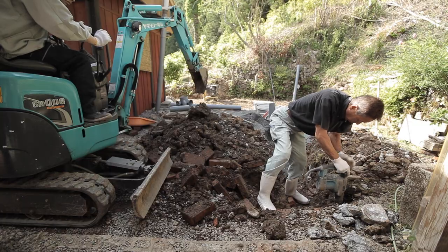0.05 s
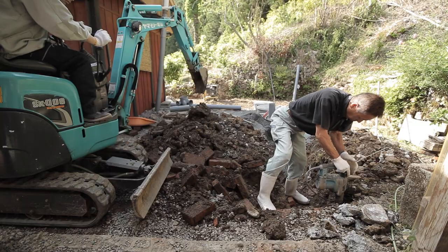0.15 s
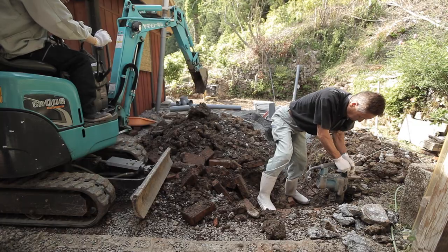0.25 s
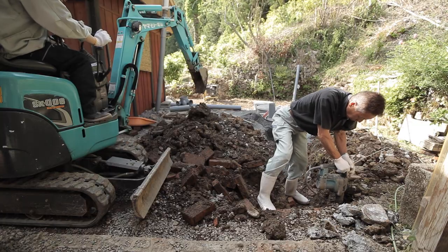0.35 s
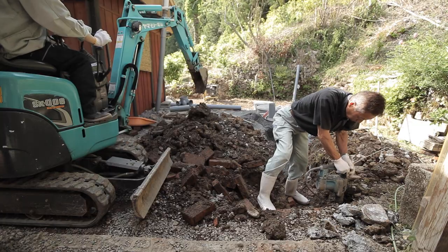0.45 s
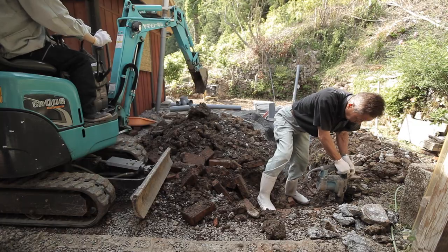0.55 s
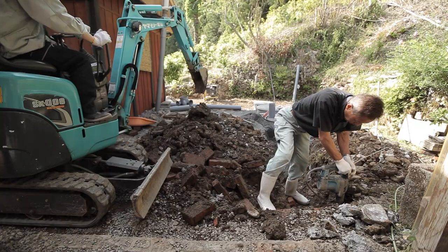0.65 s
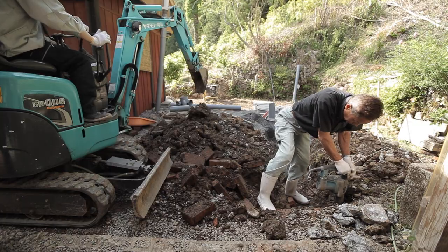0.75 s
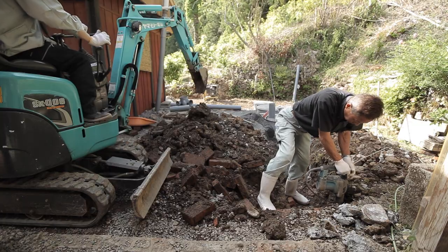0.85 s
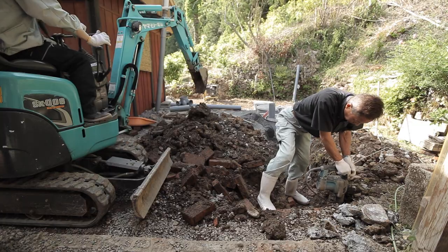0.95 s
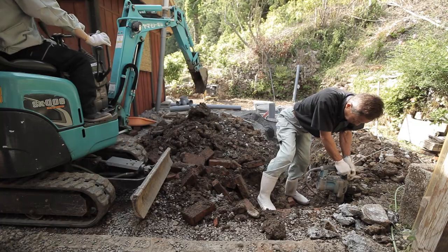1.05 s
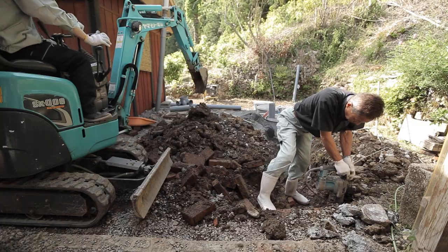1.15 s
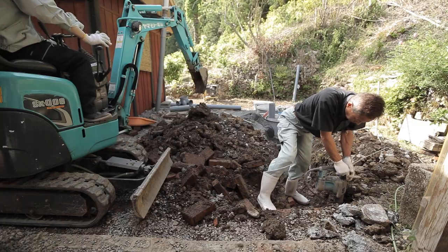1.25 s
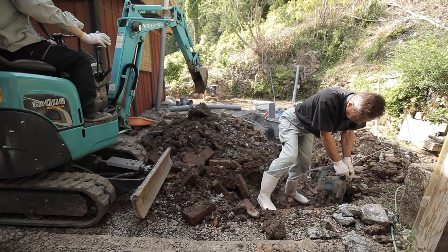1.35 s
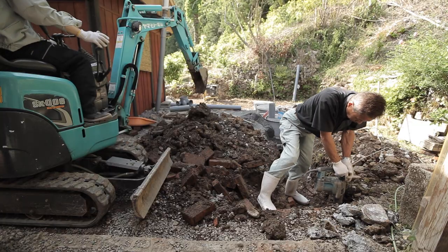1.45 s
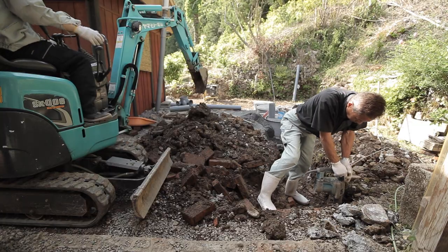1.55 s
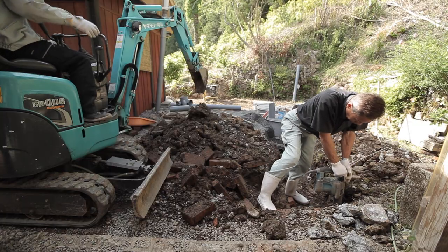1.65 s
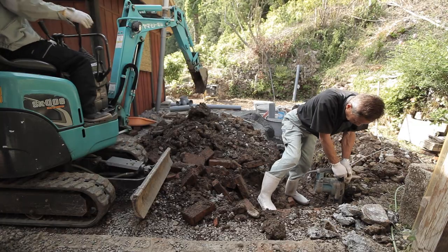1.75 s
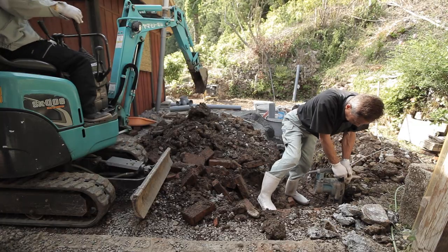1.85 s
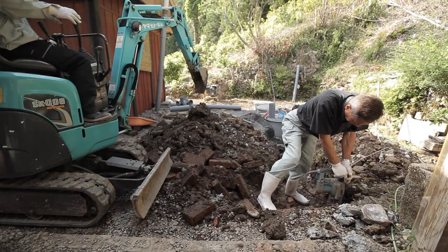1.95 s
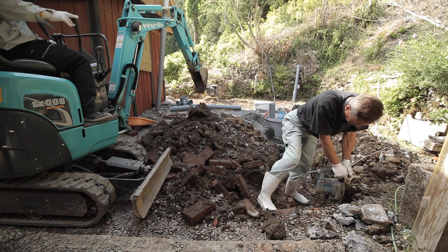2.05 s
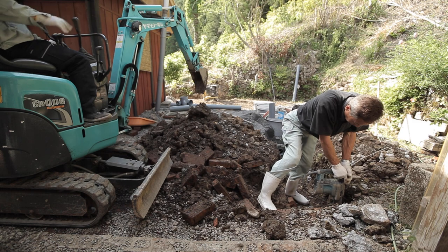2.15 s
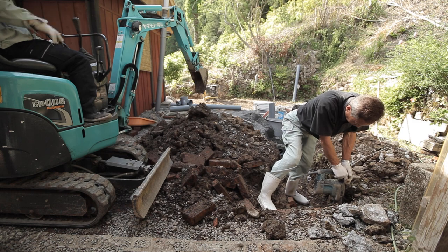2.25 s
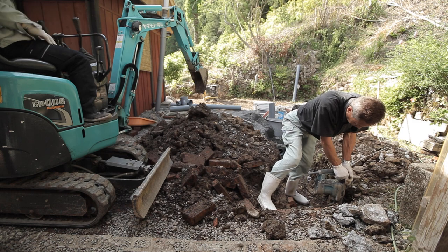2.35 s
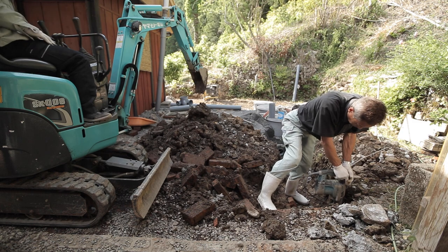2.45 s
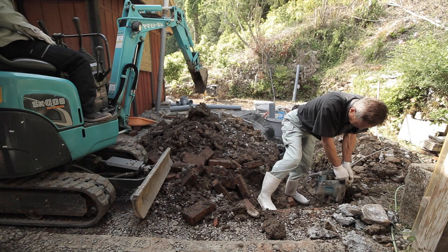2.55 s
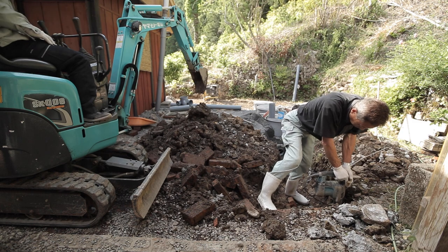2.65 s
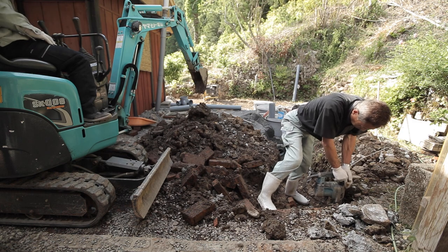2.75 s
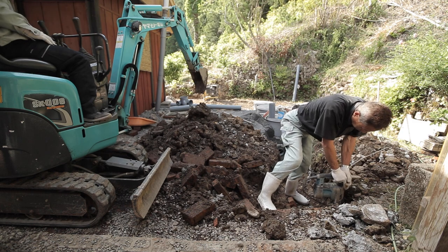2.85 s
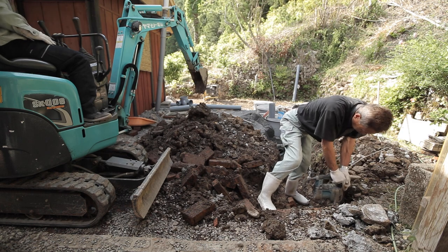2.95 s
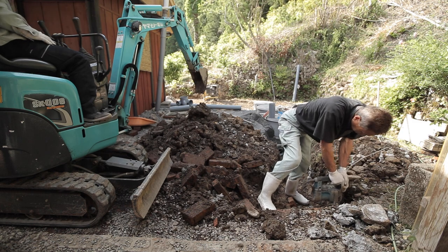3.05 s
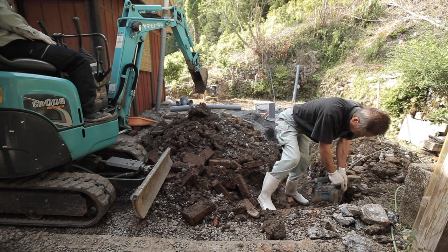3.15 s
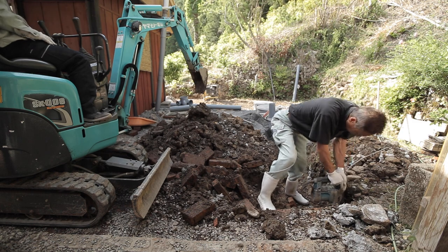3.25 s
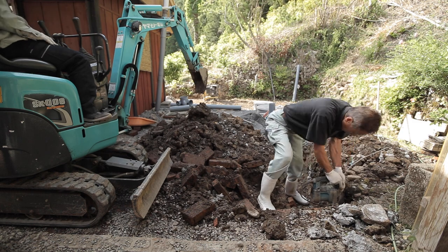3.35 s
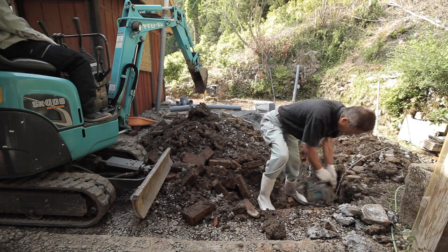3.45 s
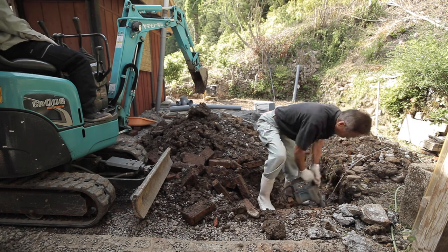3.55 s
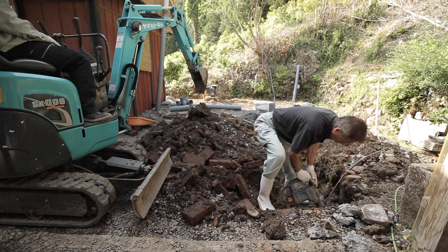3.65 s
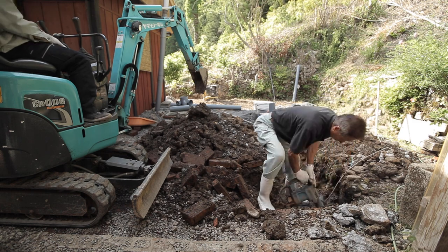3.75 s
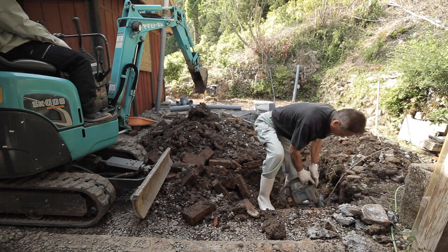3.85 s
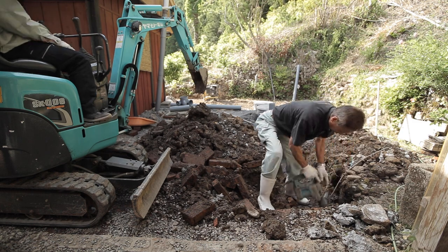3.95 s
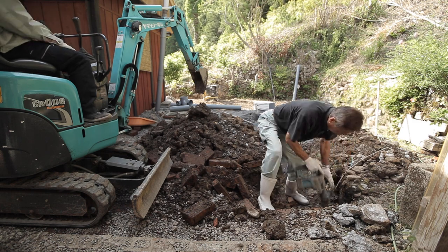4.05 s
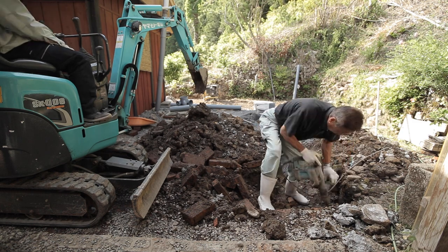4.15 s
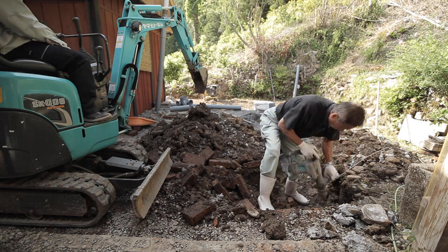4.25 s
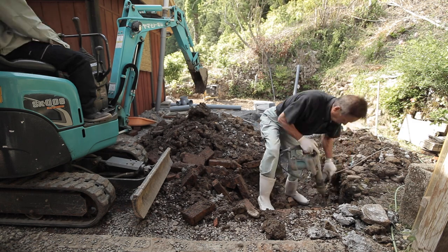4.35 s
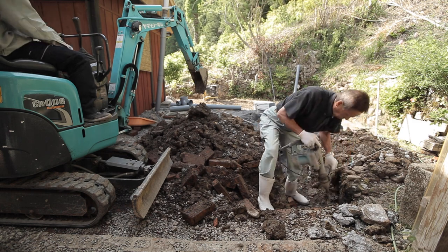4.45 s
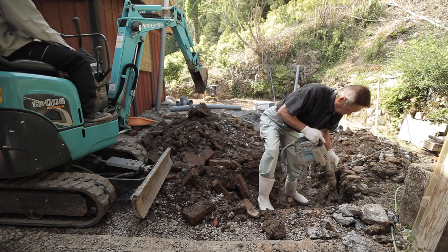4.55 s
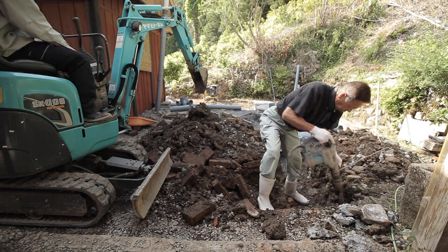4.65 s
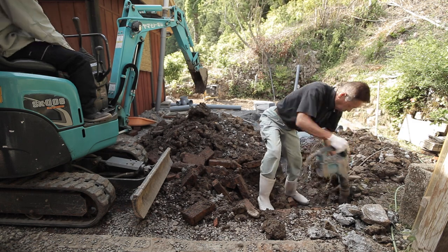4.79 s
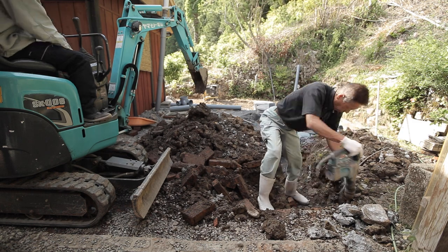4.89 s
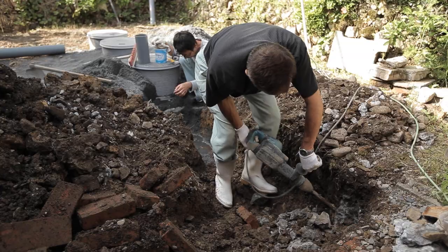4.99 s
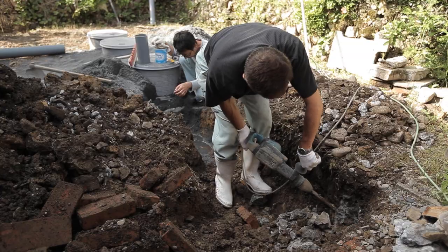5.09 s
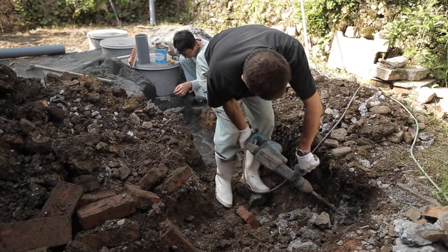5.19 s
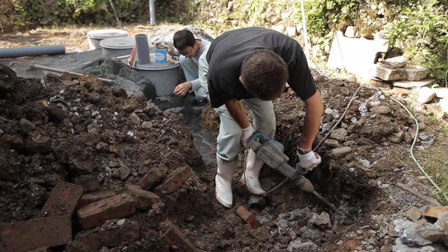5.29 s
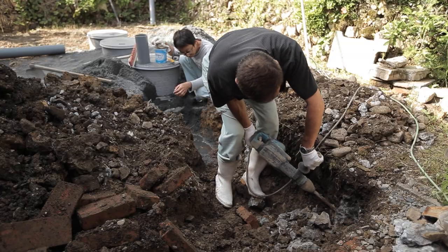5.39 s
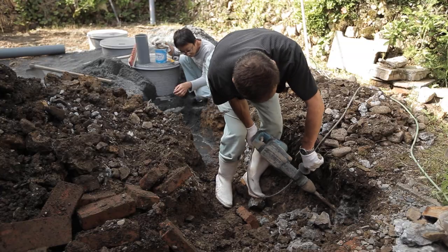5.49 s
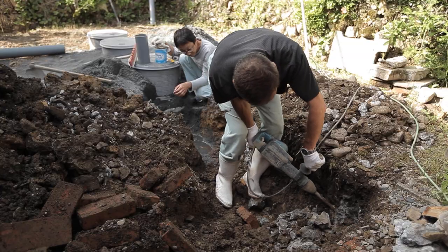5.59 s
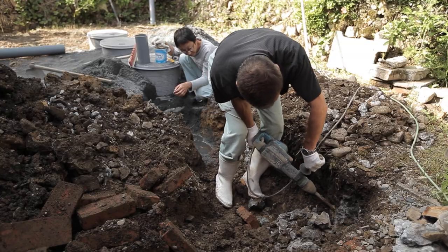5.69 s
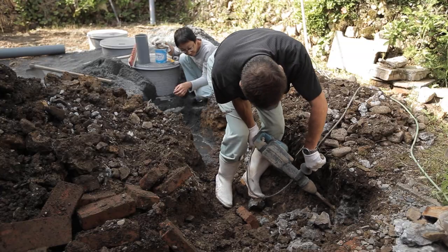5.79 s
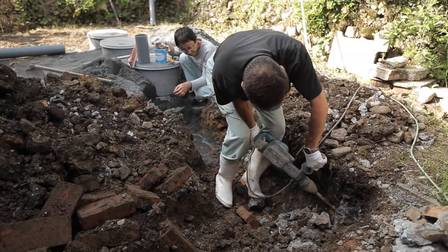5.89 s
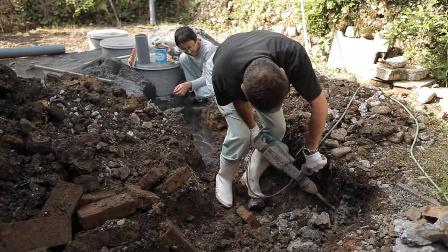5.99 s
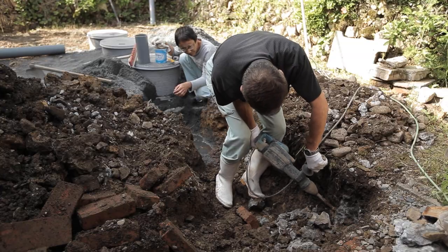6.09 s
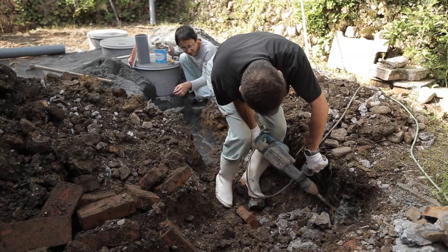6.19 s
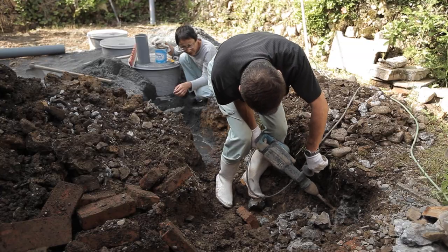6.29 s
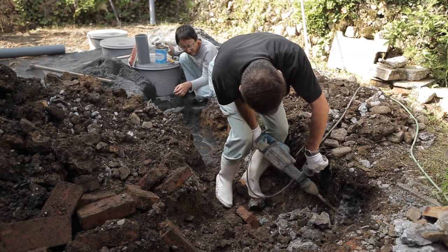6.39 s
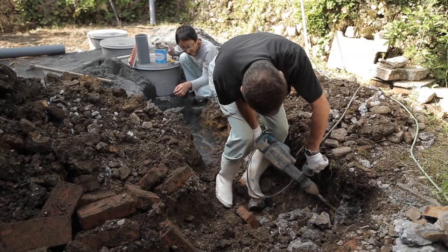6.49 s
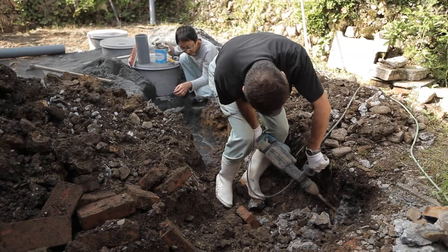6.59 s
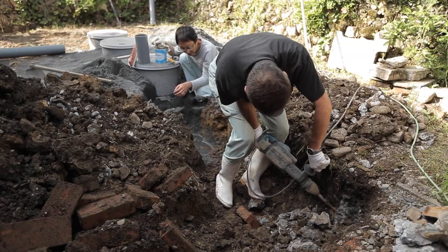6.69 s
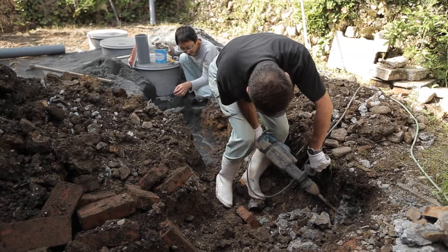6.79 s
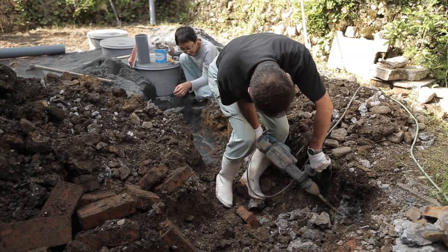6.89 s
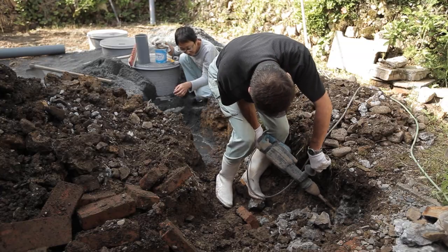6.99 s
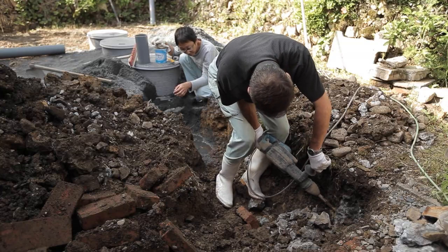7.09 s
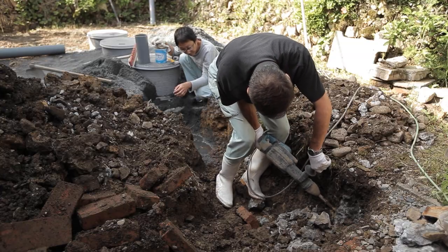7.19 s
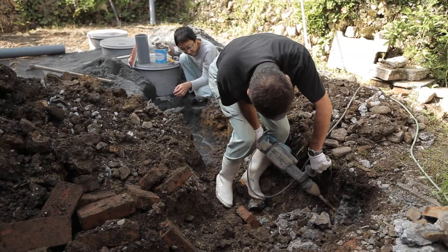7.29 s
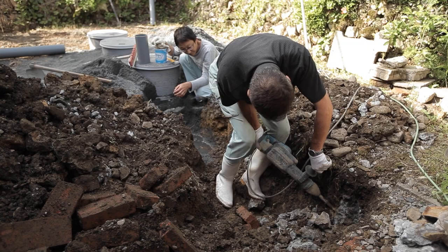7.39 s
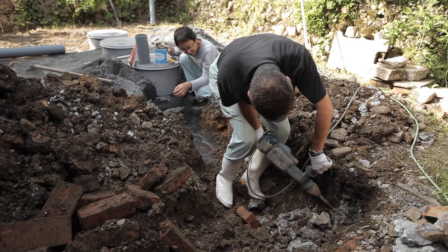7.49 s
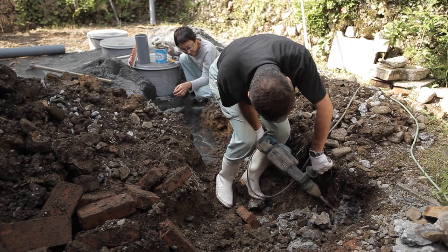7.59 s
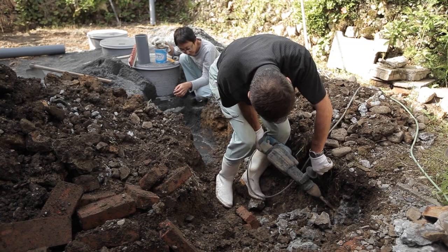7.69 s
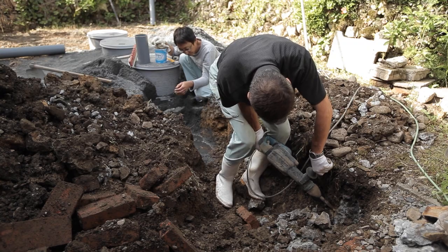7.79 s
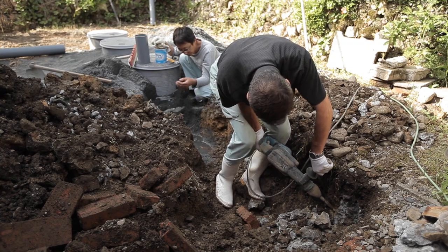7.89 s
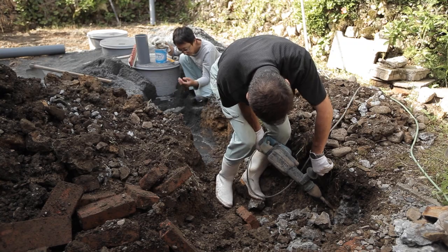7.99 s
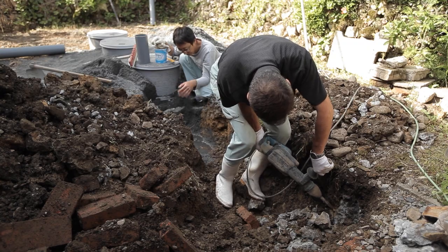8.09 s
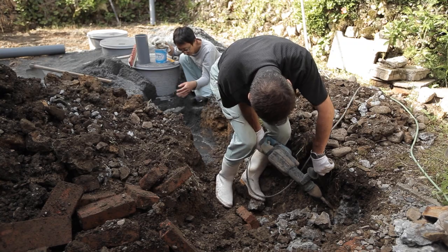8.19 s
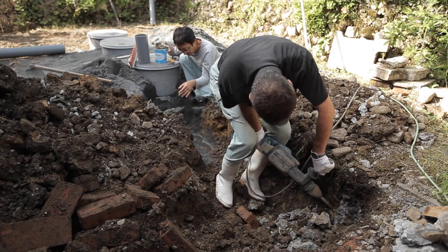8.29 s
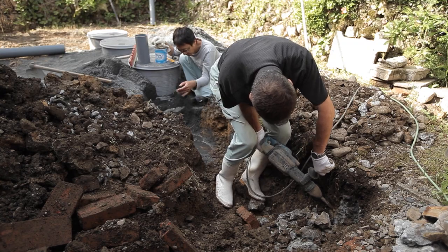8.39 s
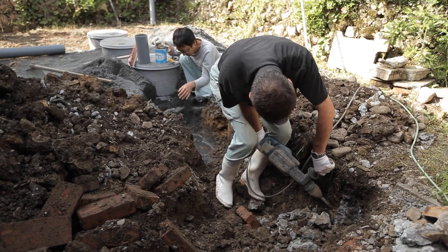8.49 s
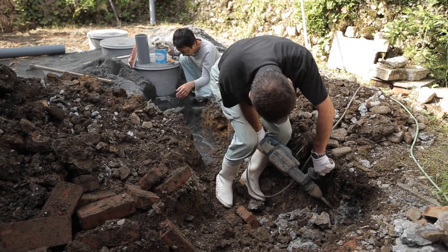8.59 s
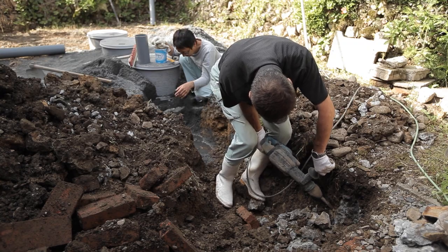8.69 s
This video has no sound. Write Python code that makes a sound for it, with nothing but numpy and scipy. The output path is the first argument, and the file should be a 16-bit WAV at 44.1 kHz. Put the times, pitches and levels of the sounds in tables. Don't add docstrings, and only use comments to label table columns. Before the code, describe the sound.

From 0 to about 3.5 s an electric demolition hammer is already working on stony ground, striking roughly 44 times a second so the blows fuse into a harsh, throbbing rattle: dull mid-range thuds, low air push, whining gear teeth, bright steel and sprayed grit, with dull outdoor echoes. The thud weakens from about 2.8 s. Around 3.6 s the tool lifts; a couple of loose taps, then a thinner whirring idle with brush hiss and housing clatter, sagging slightly in speed near 4 s. A soft low thump comes at 4.7 s, then a brief bite from 4.84 to 5.0 s. The scene cuts abruptly; sharp ticking taps run to 5.35 s, hammering resumes lightly, strengthens after 5.6 s, speeds up near 6.4 s and continues to the end at 8.7 s, brighter and more ringing. Loud peaks distort the small microphone.

```python
import sys
import numpy as np
from scipy import signal
from scipy.fft import rfft, irfft
from scipy.io import wavfile
from scipy.ndimage import uniform_filter1d

SR = 44100
rng = np.random.default_rng(int(sys.argv[2]) if len(sys.argv) > 2 else 0)


def attenuation_scalar(level_db):
    decades = np.asarray(level_db, float) / 20
    return 10 ** decades


def transcribe(u):
    v = np.clip(np.atleast_2d(u).T, -1, 1)
    q = np.round(v * 32767).astype(np.int16)
    wavfile.write(sys.argv[1], SR, q)


N = 385434
T = np.arange(N) / SR
SCENE_CHANGE_S = 5.012
SECOND_SIDE = (T > 4.2).astype(int)
USUAL_DB = -35


def columns(rows):
    s, *values = np.transpose(rows)
    return [np.interp(T, s, v) for v in values]


def evened(x):
    return x / np.sqrt(np.mean(x ** 2) + 1e-20)


def filtered(x, order, hz, kind):
    return signal.sosfilt(signal.butter(order, hz, kind, fs=SR, output="sos"), x)


def coloured(x, points):
    f, level_db = np.transpose(points)
    hz = np.fft.rfftfreq(len(x), 1 / SR)
    gain_db = np.interp(np.log(hz + 1), np.log(f + 1), level_db)
    return irfft(rfft(x) * attenuation_scalar(gain_db), len(x))


def band_evened(x, lo_hz, hi_hz):
    power = filtered(x, 4, [lo_hz, hi_hz], "bandpass") ** 2
    smooth = uniform_filter1d(uniform_filter1d(power, 4000), 4000)
    return x / np.sqrt(abs(smooth) + 1e-12)


def drift(seconds):
    size = round(seconds * SR)
    return evened(uniform_filter1d(uniform_filter1d(rng.standard_normal(N), size), size))


def modes(x, table, spans, wander=0., flip=1):
    out = np.zeros(N)
    sway = wander * drift(0.012)
    for k, ((hz, width, db), (start, end)) in enumerate(zip(table, spans)):
        a, b = max(round(start * SR), 0), min(round(end * SR), N)
        own_sway = np.roll(sway, k * SR // 2)[a:b]
        carrier = np.exp(2j * np.pi * np.cumsum(hz * (1 + own_sway)) / SR)
        decay = np.exp(-np.pi * width / SR)
        ringing = (carrier * signal.lfilter([1j], [1, -decay], x[a:b] / carrier)).real
        out[a:b] += flip ** k * attenuation_scalar(db) * np.sqrt(width) * ringing
    return out


def lobe(turns, place, length):
    off = (turns - place + .5) % 1 - .5
    return off, np.exp(-.5 * (off / length) ** 2)


def eased():
    moment_s, length_s, dip_db = 5.81, 0.035, -6
    return dip_db * np.exp(-.5 * ((T - moment_s) / length_s) ** 2)


def crank():
    # start in seconds, crank speed in turns per second held from then on.
    speed_steps = [(0, 44.161), (.9, 44.114), (1.6, 44.177), (2.9, 44.025), (3.3, 44.175), (3.5, 44.708),
                   (3.74, 43.056), (3.92, 41.9), (3.97, 40.1), (4.07, 41.63), (4.2, 41.366),
                   (5.012, 41.316), (5.6, 41.178), (6.33, 42.857), (6.4, 44.66), (6.65, 44.082),
                   (7.2, 44.2), (8.4, 43.382)]
    s, per_s = np.transpose(speed_steps)
    held = per_s[np.searchsorted(s, T, "right") - 1]
    settle_s = .09
    speed = uniform_filter1d(held, round(settle_s * SR), mode="nearest")
    return -.11 + np.cumsum(speed) / SR + .22 * (T >= SCENE_CHANGE_S)


def site(x):
    t = np.arange(SR // 4) / SR
    tail = rng.standard_normal(len(t)) * attenuation_scalar(-60 * t / 0.27) * (t > .012)
    tail = coloured(tail, [(120, -12), (900, -12), (2000, -4), (4000, -4), (9000, -12)])
    return signal.fftconvolve(x, tail / np.linalg.norm(tail))[:N]


def footfall():
    t = np.maximum(T - 4.735, 0)
    return attenuation_scalar(-44) * np.sin(2 * np.pi * 135 * t) * (t / 0.016) * np.exp(1 - t / 0.011)


def taps():
    # start in seconds, peak level in dB.
    single_strokes = [(3.712, -31), (3.7589, -34), (3.9938, -39), (4.7775, -26), (5.03, -22), (5.0769, -28),
                      (5.1248, -20.5), (5.151, -19), (5.223, -24), (5.2954, -24), (5.340, -16)]
    drive = np.zeros(N)
    spit = np.exp(-np.arange(400) / 57.0)
    for s, db in single_strokes:
        at = round(s * SR)
        drive[at:at + 400] += attenuation_scalar(db) * spit * rng.standard_normal(400)
    click = coloured(drive, [(1500, -25), (5000, 0), (16000, -3)])
    ping = modes(drive, [(8730, 180, 0.051)], [(0, N / SR)])
    return attenuation_scalar(-12) * click + attenuation_scalar(-34.5) * ping


def clatter(throb):
    # resonance in Hz, width in Hz, level in dB.
    housing_parts = [(218, 20, -21.5), (547, 43, -13), (1465, 80, -35), (3960, 250, -2.5),
                     (5280, 260, -4.5), (6300, 200, -16), (9800, 200, -16)]
    knocks = rng.standard_normal(N) * attenuation_scalar(throb + 7.0 * drift(0.0013))
    total = np.zeros(N)
    for part in housing_parts:
        total += attenuation_scalar(6.6 * drift(0.077)) * modes(knocks, [part], [(0.0075, N / SR)], 0.006)
    return evened(total)


def motor_hiss(turns, throb_db):
    # frequency in Hz, noise density in dB per Hz.
    hiss_colour = [(30, -65), (165, -29), (344, -17), (560, -8.5), (780, -5), (1000, -5), (1750, -4.5),
                   (2800, -10), (3900, -7), (5200, -11), (7000, -14.5), (9300, -17), (10800, -31),
                   (15800, -32)]
    throb = -1.6 * lobe(turns, .42, 0.15)[1] - 1.6 * lobe(turns, 0.99, 0.017)[1]
    hiss = band_evened(coloured(rng.standard_normal(N), hiss_colour), 2050, 3500)
    hiss = hiss * attenuation_scalar(throb_db * throb + 1.66 * drift(0.003))
    return hiss + attenuation_scalar(-5.0) * clatter(throb_db * throb)


def motor():
    # time in seconds, load on the teeth in dB, lean of the mesh toward its octave in dB.
    tooth_load = [(0, -27.5, -12), (1.5, -29.5, -8), (2.2, -30.5, -2), (2.4, -32, -4), (3.5, -33.5, 3.5),
                  (3.62, -38, -1.5), (3.85, -39.5, 4), (4.02, -55, 17.5), (4.12, -39, 4.5),
                  (4.6, -37.5, 7.5), (4.98, -33, -1.5), (5.04, -46, 10.5), (5.45, -42, 12),
                  (5.58, -29.5, -3), (5.8, -33.5, -2), (5.92, -29, -16), (7.2, -28, -10.5),
                  (8.74, -23, -4.5)]
    gear_push = [(0, 0.87, 0.08, 1, 0.27), (3.5, 0.76, 0.16, 0.82, 0.16), (3.7, .75, 0.11, .68, 0.09),
                 (5.3, 0.72, 0.11, 0.64, 0.09), (5.9, 0.8, .08, 0.7, 0.22), (6.4, 0.85, 0.11, 0.74, 0.11),
                 (8.74, 0.81, 0.07, 0.93, 0.06)]
    # time in seconds, return-stroke share of the octave (0-1), high tooth orders in dB, hiss throb in
    # dB.
    return_stroke = [(0, 0, 1, -2), (2.7, 0, -5.5, 0), (3.5, 0, -7, 1), (3.7, 0.8, -0.5, 1.5),
                     (4.1, 0.77, -19, 1), (5.3, 0.95, -14, 4), (5.5, 0, -9, 0), (6.3, 0.3, 6, 4.5),
                     (6.5, 0.8, 7, 4.5), (8.74, 0.4, -9, -4.5)]
    # time in seconds, whine in cycles per turn, octave in cycles per turn.
    tooth_rate = [(0, 43, 82.7), (3.4, 42.8, 82.2), (3.68, 42, 81.6), (3.82, 42, 83.6), (4.0, 42, 81.8),
                  (4.12, 42, 83.4), (4.25, 42, 82.6), (4.8, 42, 82.6), (4.95, 41, 80.5), (5.1, 41.5, 82.6),
                  (5.6, 42.4, 82.2), (6.2, 42.6, 82), (6.4, 41.3, 82.5), (8.25, 41, 81.5),
                  (8.4, 40.2, 81.7), (8.74, 40.3, 82)]
    turns = crank()
    load_db, lean_db = columns(tooth_load)
    cycles, cycles2 = columns(tooth_rate)
    place, length, place2, length2 = columns(gear_push)
    back, high_db, throb_db = columns(return_stroke)

    slack = 0.27 * np.maximum(-33.5 - load_db, 0)
    whine_db = load_db + slack * drift(0.026)
    octave_db = load_db + lean_db
    hiss_db = -35 + 0.057 * (load_db - USUAL_DB) + .8 * drift(.03) + eased()

    off, bell = lobe(turns, place, length)
    after, echo = lobe(turns, place + .24, 0.023)
    whine = bell * np.sin(2 * np.pi * cycles * off)
    whine = whine + 1.73 * echo * np.sin(2 * np.pi * cycles * after)

    off, bell = lobe(turns, place2, length2)
    after, echo = lobe(turns, place2 + .5, length2)
    octave = bell * np.sin(2 * np.pi * cycles2 * off + 0.48 * drift(0.0043))
    octave = octave + back * echo * np.sin(2 * np.pi * cycles2 * after + 0.12 * drift(0.0056))
    high = np.zeros(N)
    for order, db in ((3, 4.0), (4, 4.5), (5, 2)):
        high += attenuation_scalar(db) * np.sin(np.pi * order * cycles2 * off + 2.8 * drift(0.0092))
    octave = evened(octave) * attenuation_scalar(1.2 * drift(0.05)) + attenuation_scalar(high_db) * evened(bell * high)

    whine = attenuation_scalar(whine_db - 2.5 + 0.5 * drift(0.02)) * evened(whine)
    return whine + attenuation_scalar(octave_db - 3.0) * octave + attenuation_scalar(hiss_db - 4.0) * motor_hiss(turns, throb_db)


def ground_shake(hit):
    shake = filtered(hit + 0.016 * rng.standard_normal(N), 2, [30, 100], "bandpass")
    return attenuation_scalar(-65 + 16 * SECOND_SIDE) * evened(shake)


def air_push(hit, luck):
    # resonance in Hz, width in Hz, level in dB.
    low_modes = [(193, 34, 32), (270, 270, -18), (127.6, 13, 6.5), (262, 38, 6.5)]
    low_spans = [(0, 4), (0, 4), (5.9, 9), (4, 9)]
    late_s = [0.0046, 0.00603]
    push = modes(hit * attenuation_scalar(0.22 * luck[:, 1]), low_modes, low_spans)
    first, second = [np.roll(push, round(s * SR)) for s in late_s]
    low = filtered(np.where(SECOND_SIDE, second, first), 4, 145, "highpass")
    return band_evened(low, 110, 280)


def ground_thud(hit, luck, rattle):
    # resonance in Hz, width in Hz, level in dB.
    thud_modes = [(348, 145, 5), (473, 57, 2), (665, 53, -3.5), (565, 99, 0.5), (712.6, 60, 6),
                  (813, 24, -6.5), (435, 230, 4.5), (1032, 39, 2.5), (434, 43, -2.5), (670, 160, 9),
                  (1026, 95, 5.5), (1268, 64, 4.5), (351, 97, -2.5), (610, 81, 3), (825, 50, 2),
                  (1004, 83, -0.5)]
    thud_spans = [(0, 2.82), (0, 2.82), (0, 2.82), (0, .64), (0, 3.6), (1, 2.82), (2.82, 3.6), (2.82, 3.4),
                  (4.5, 5.2), (4.5, 5.2), (4.5, 5.2), (4.5, 5.2), (5.2, 9), (6.4, 9), (5.2, 9), (5.2, 9)]
    at = np.flatnonzero(hit)
    loose = 1 + (T[at] < .64)
    slip = .00017 * SR * luck[at, 2] * attenuation_scalar(5 * drift(.08)[at]) * loose
    slipped = np.zeros(N)
    slipped[np.clip(at + abs(slip).astype(int), 0, N - 1)] = 1
    grind = np.array([.012, .05])[SECOND_SIDE] * rattle * rng.standard_normal(N)
    thud = modes(slipped * attenuation_scalar(1.6 * luck[:, 0]) + grind, thud_modes, thud_spans, 0.016, flip=-0.96)
    return band_evened(filtered(thud, 4, 145, "highpass"), 300, 900)


def steel_ring(hit, luck, part, rattle):
    # resonance in Hz, width in Hz, level in dB.
    steel_modes = [(4470, 180, -6), (5800, 120, -15), (8760, 150, 6), (8860, 870, 0), (9460, 52, -11),
                   (12300, 220, -4), (3980, 670, -13.5), (5610, 290, -1), (5930, 100, -10), (8706, 180, 3),
                   (9130, 140, -1.5), (9800, 42, -10), (12380, 140, -4.5), (12530, 350, -4)]
    steel_spans = [(0, 4), (0, 4), (0, .3), (0, 4), (1.9, 4), (0, .25), (4, 9), (5.2, 9), (5.45, 5.82),
                   (4, 9), (5.8, 9), (4.93, 6.35), (4, 7.55), (7.55, 9)]
    strike = np.array([.3, 6.5])[SECOND_SIDE] * hit * attenuation_scalar(3.3 * luck[:, 0])
    ring = modes(strike + rattle * rng.standard_normal(N), steel_modes, steel_spans, 0.0087)
    gripped = uniform_filter1d(1. * (part > .4), size=80)
    return band_evened(ring * attenuation_scalar(-2 * SECOND_SIDE * gripped), 8200, 10000)


def grit_spray(luck, part):
    # frequency in Hz, noise density in dB per Hz.
    grit_colours = [
        [(300, 14), (900, 12), (2500, 13.5), (6000, 13.5), (10000, 11.5), (12000, -4.5), (15500, -2.5)],
        [(300, -4), (900, 14.5), (2500, 12.5), (6000, 12.5), (10000, 11), (12000, -1), (15500, -1.5)],
    ]
    late = lobe(part, 0.18, 0.18)[1] * (part < .7)
    spray = late + 1.26 * np.exp(-part / 0.069) + 0.16
    spray = spray * attenuation_scalar(0.66 * luck[:, 2] + 0.92 * drift(0.00059))
    noise = rng.standard_normal(N)
    first, second = [coloured(spray * noise, points) for points in grit_colours]
    return band_evened(np.where(SECOND_SIDE, second, first), 10800, 15500)


def blows():
    # time in seconds, force into the ground in dB,
    # freedom of the steel to ring in dB.
    bites = [
        [(0, -27.5, -31), (.25, -30.5, -34.5), (1.4, -29, -42), (1.7, -26.5, -42), (2.75, -31.5, -52.5),
         (2.87, -40, -41), (3.13, -36.5, -48.5), (3.47, -34, -37), (3.56, -51, -41)],
        [(4.838, -40, -27), (4.93, -28.5, -27.5), (5.012, -26.5, -24)],
        [(5.36, -59, -30), (5.41, -52, -25.5), (5.6, -48.5, -27), (6.3, -42, -25), (6.75, -38, -26.5),
         (7.3, -39.5, -24.5), (8.07, -40, -30), (8.55, -35, -21), (8.74, -36.5, -25)],
    ]
    # air push in dB, grit in dB, both at the usual force and freedom.
    footing = [
        (-49, -46),
        (-59, -47.5),
        (-39, -45.5),
    ]
    lurch_db = [0.33, 0.76, 2, 1.76]
    turns = crank() - .02
    count = (np.floor(turns) - np.floor(turns[0])).astype(int)
    part = turns % 1
    luck = rng.standard_normal((count[-1] + 1, 3))[count]
    hit = np.diff(count, prepend=0) * 1.
    rattle = np.exp(-part / 0.16) * attenuation_scalar(2.5 * luck[:, 1]) + 0.04
    rattle = rattle * attenuation_scalar(2.66 * drift(0.00061))
    layers = np.array([air_push(hit, luck), ground_thud(hit, luck, rattle),
                       steel_ring(hit, luck, part, rattle), grit_spray(luck, part)])
    lurch = np.array([db * drift(0.065) for db in lurch_db])
    out = np.zeros(N)
    for rows, (push_db, grit_db) in zip(bites, footing):
        force, free = columns(rows)
        levels = np.array([push_db + force - USUAL_DB, force + 5.0, free + 2.74,
                           grit_db + 0.63 * (free - USUAL_DB) + eased()])
        within = 1. * ((T >= rows[0][0]) & (T <= rows[-1][0]))
        biting = uniform_filter1d(within, 60, mode="nearest")
        out += biting * (attenuation_scalar(levels + lurch) * layers).sum(0)
    contact = np.clip(40 * uniform_filter1d(abs(out), 2000), .05, 1)
    return out + ground_shake(hit) * contact


def scene():
    struck, first = blows(), T < SCENE_CHANGE_S
    echoes = attenuation_scalar(-15) * (first * site(struck * first) + site(struck * ~first))
    return (motor() + struck + echoes + taps() + footfall())[None]


def low_pass(x):
    return signal.sosfilt(signal.butter(12, 15940, fs=SR, output="sos"), x)


def record(dry):
    # frequency in Hz, change of level in the bass in dB.
    bass_dip = [(45, -5), (85, -6), (130, -1), (180, -0.04)]
    clip_level, edge_hz = .088, 15850
    clipped = np.clip(dry, -clip_level, clip_level)
    thinned = coloured(clipped[0], bass_dip)[None]
    lowpass = signal.firwin(801, edge_hz, window=("kaiser", 10), fs=SR)[None]
    limited = signal.oaconvolve(thinned, lowpass, "same")
    return low_pass(limited)


dry = scene()
out = record(dry)
transcribe(out)
```